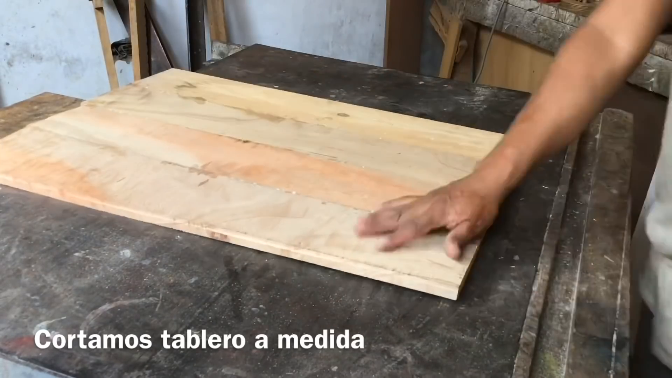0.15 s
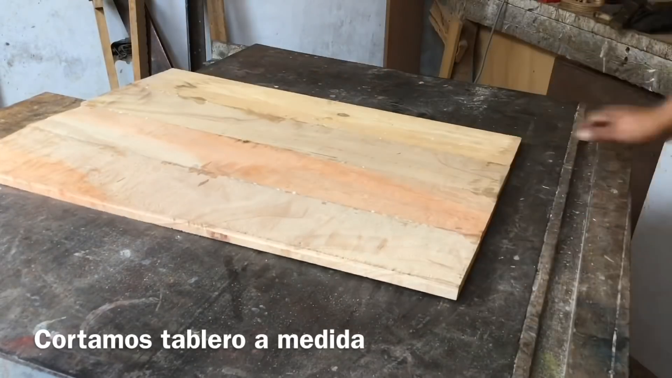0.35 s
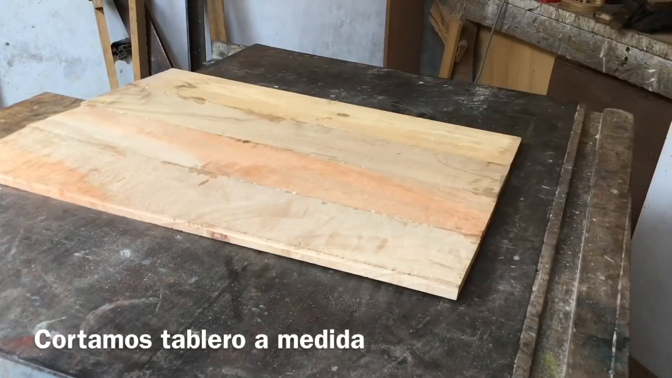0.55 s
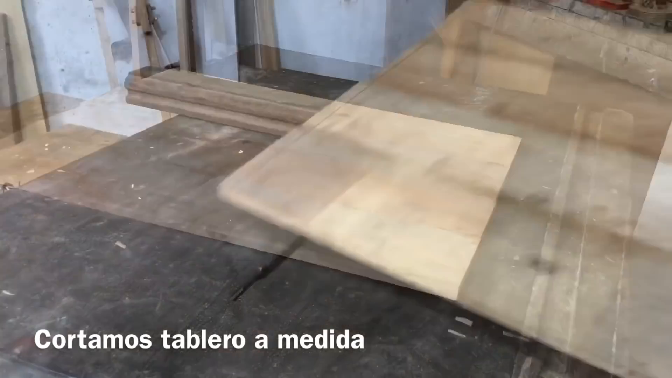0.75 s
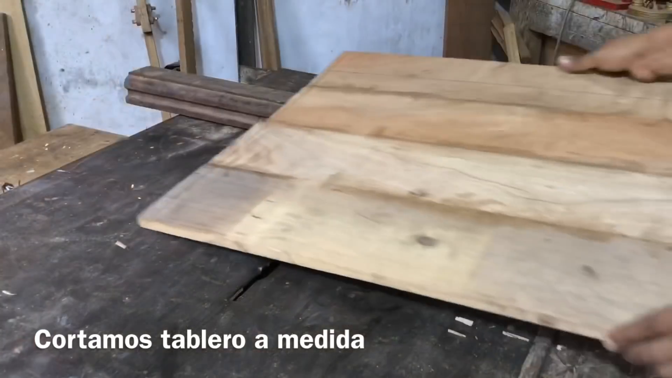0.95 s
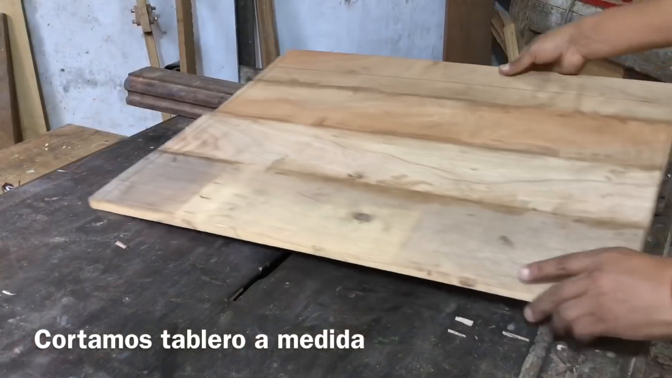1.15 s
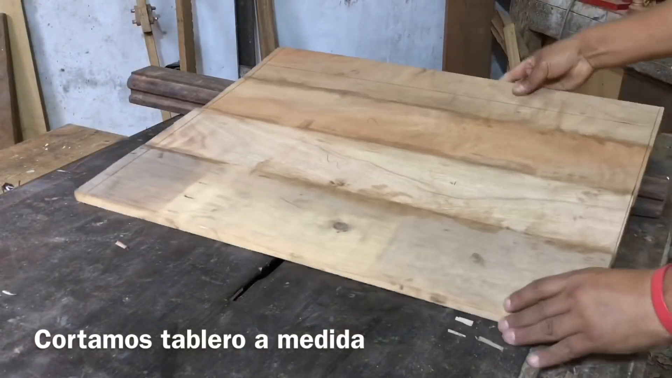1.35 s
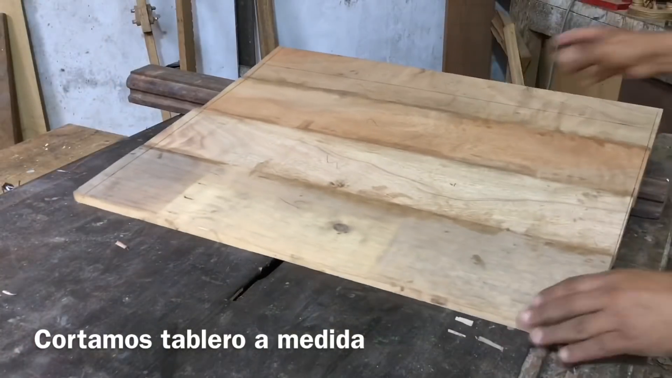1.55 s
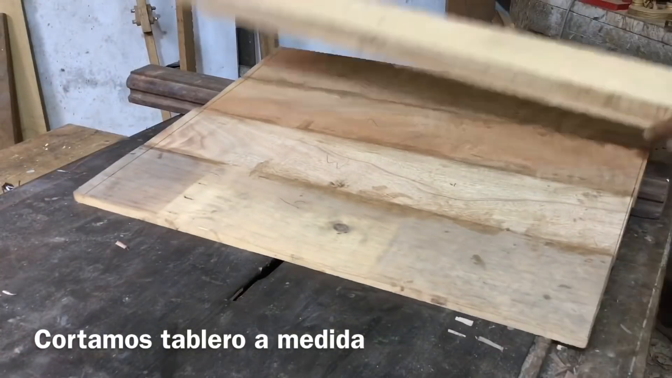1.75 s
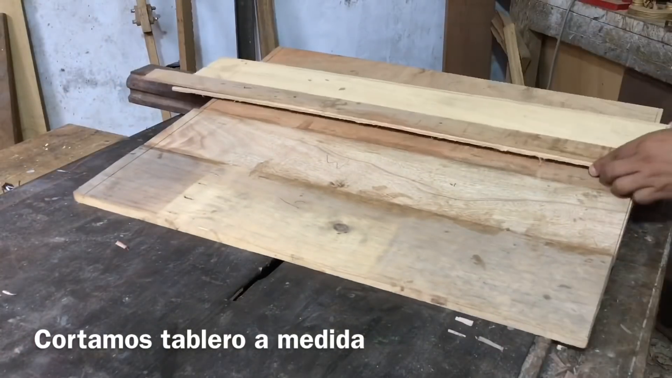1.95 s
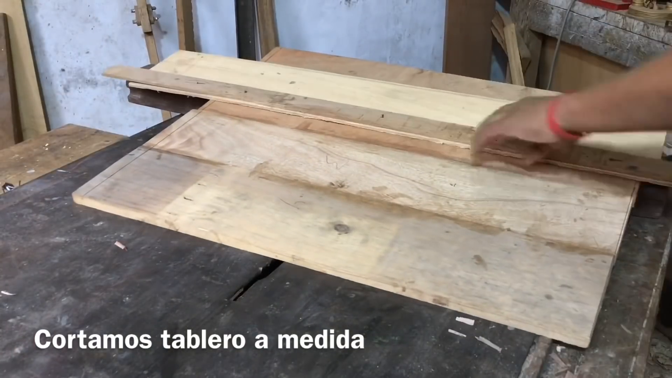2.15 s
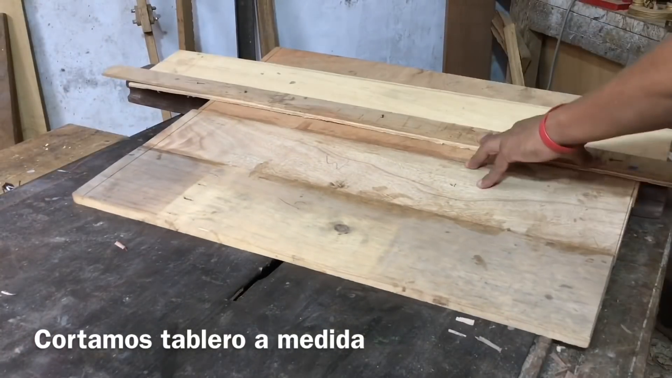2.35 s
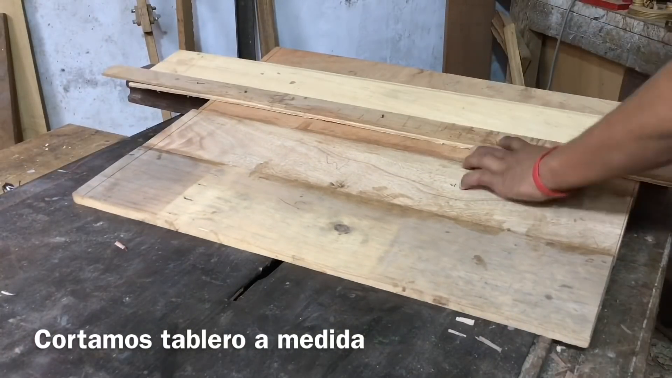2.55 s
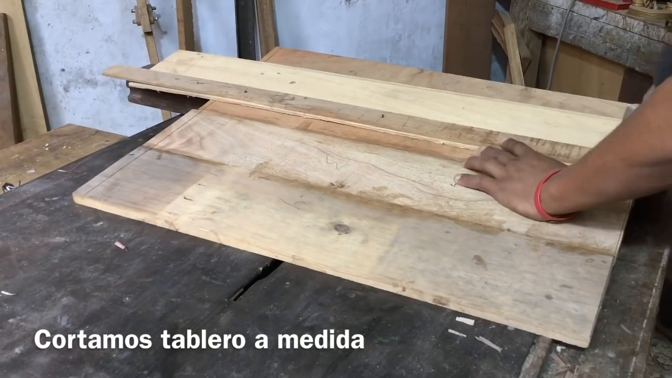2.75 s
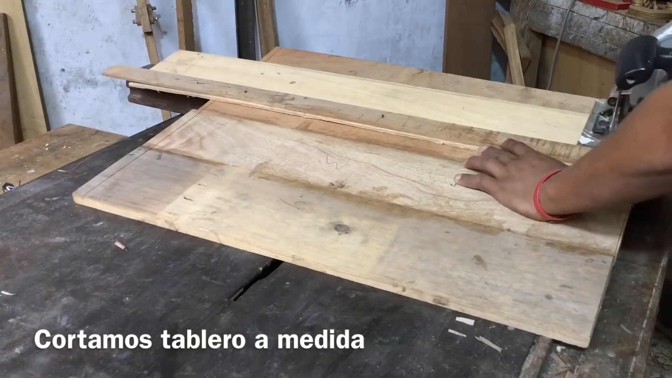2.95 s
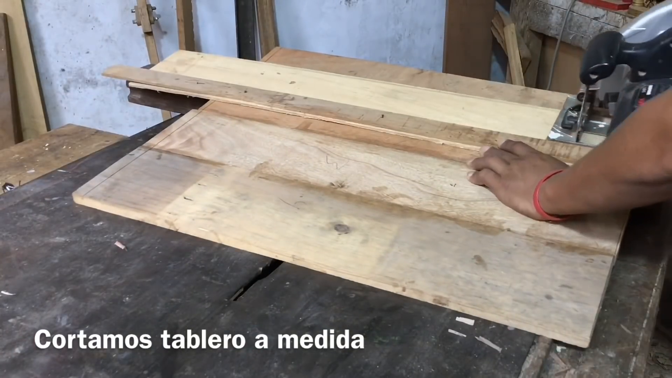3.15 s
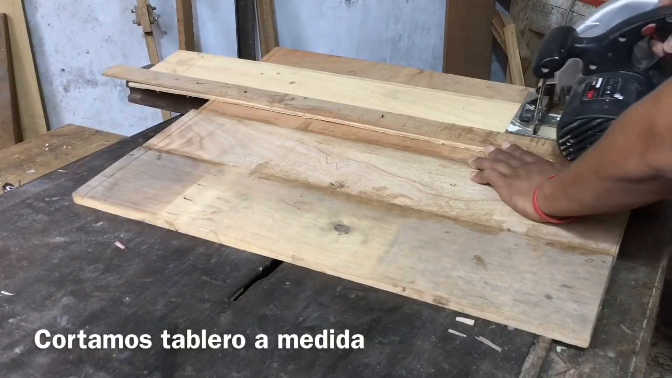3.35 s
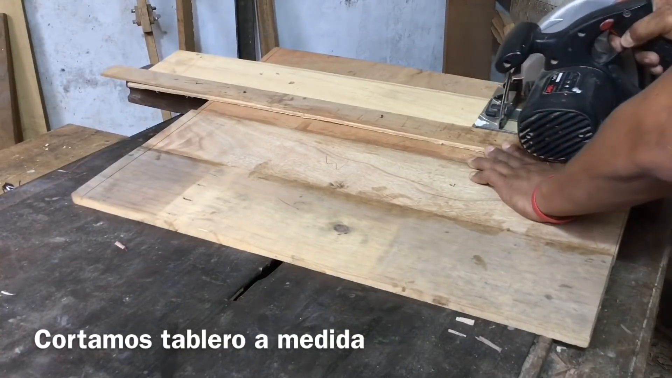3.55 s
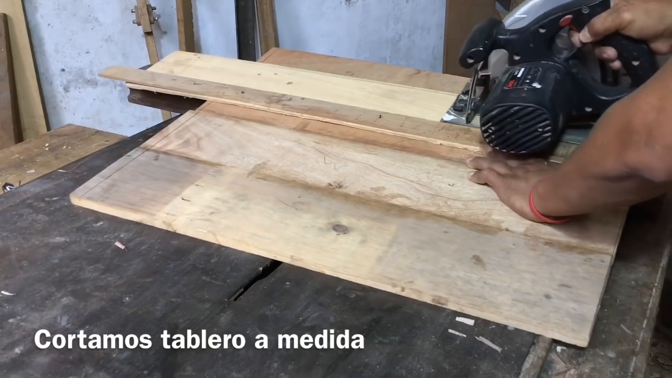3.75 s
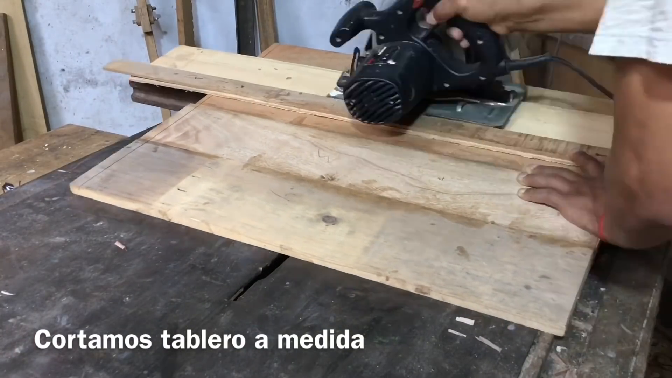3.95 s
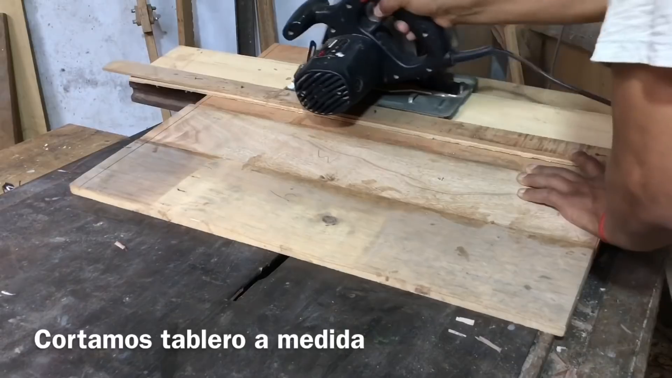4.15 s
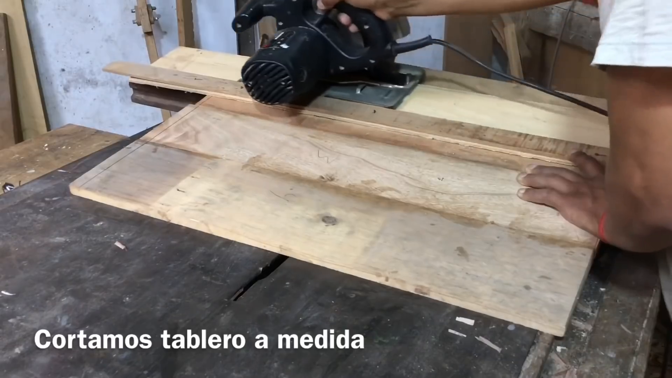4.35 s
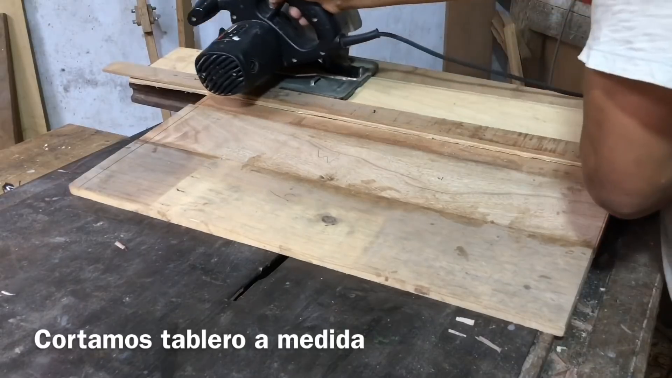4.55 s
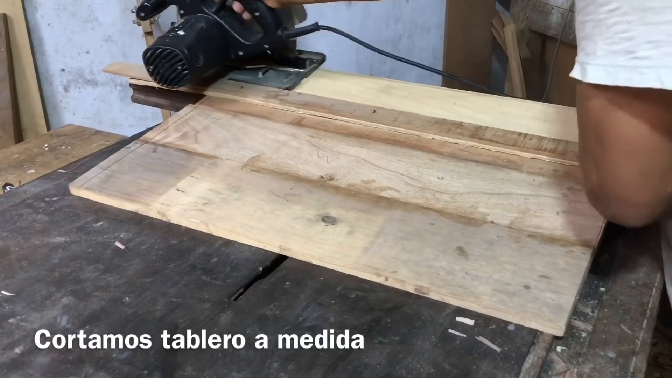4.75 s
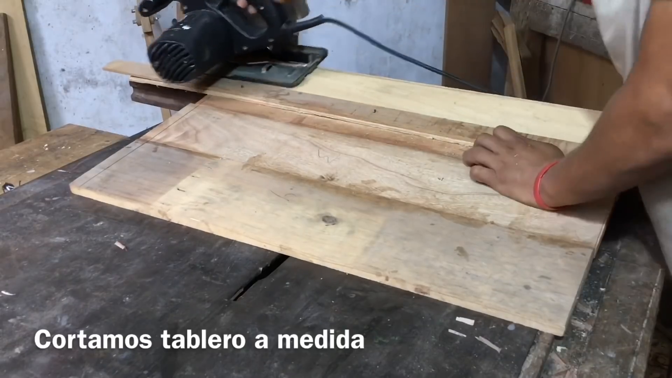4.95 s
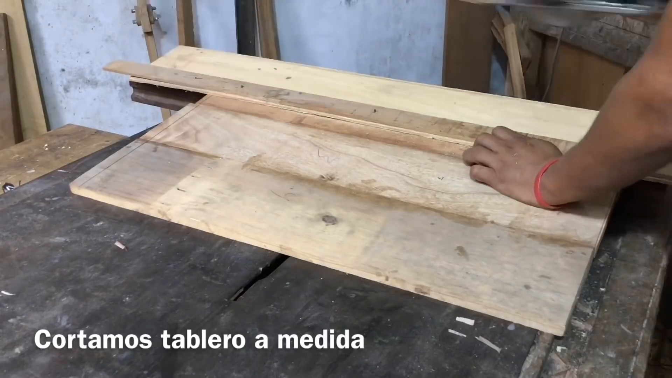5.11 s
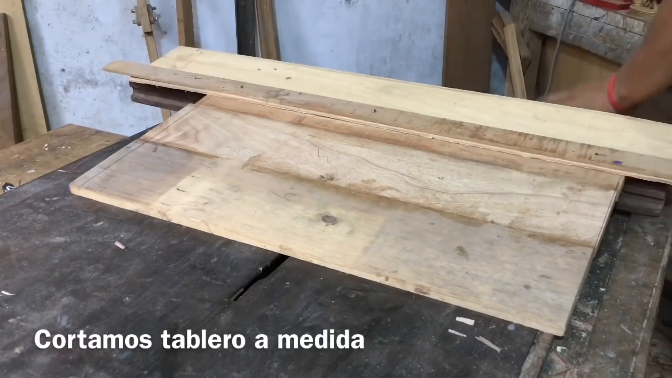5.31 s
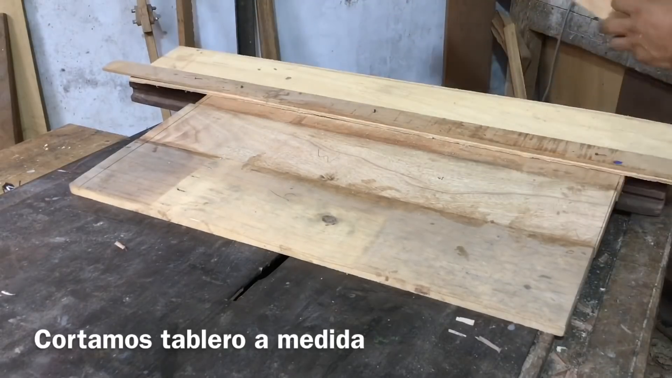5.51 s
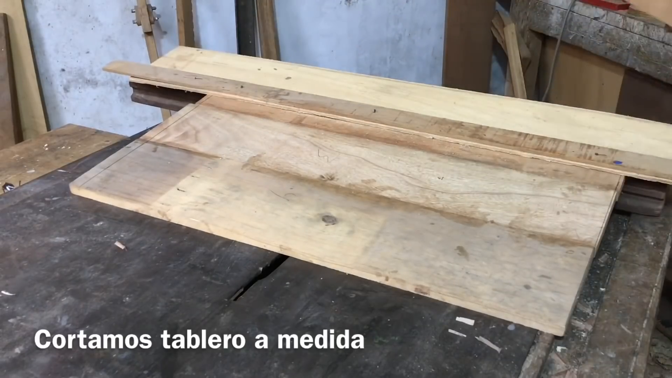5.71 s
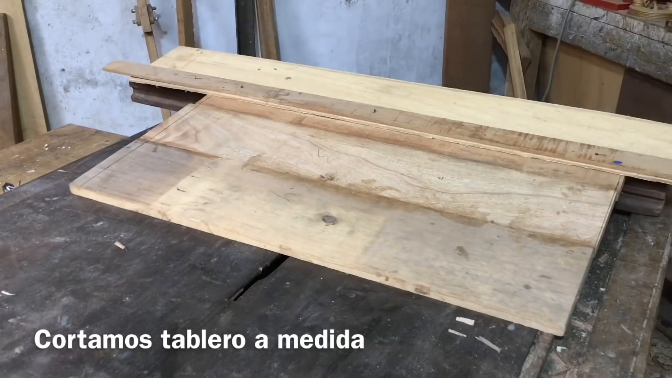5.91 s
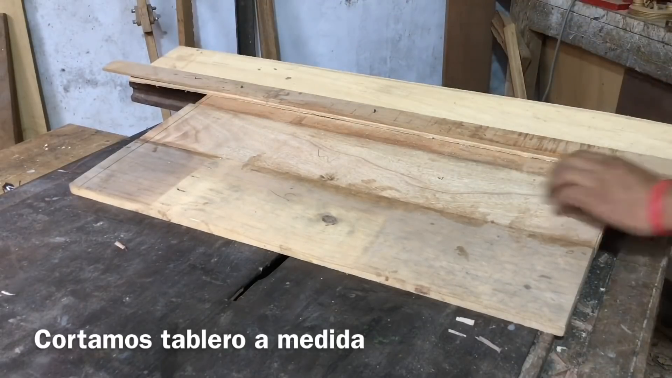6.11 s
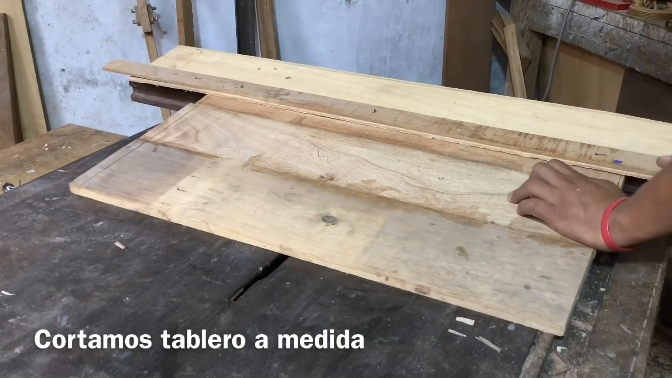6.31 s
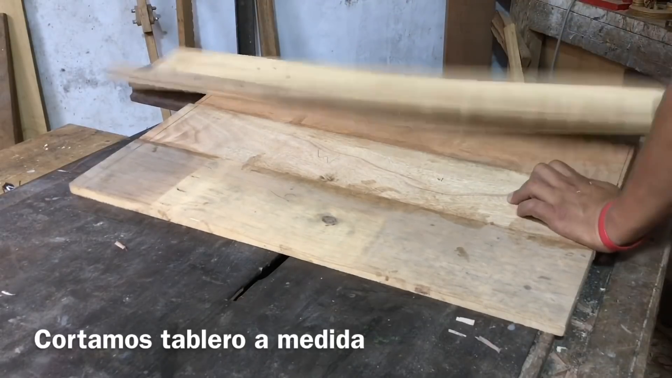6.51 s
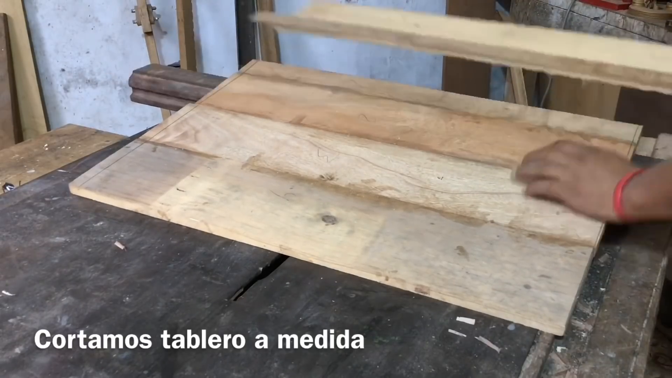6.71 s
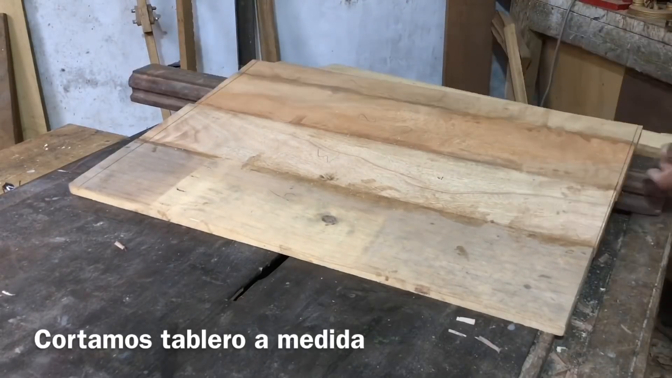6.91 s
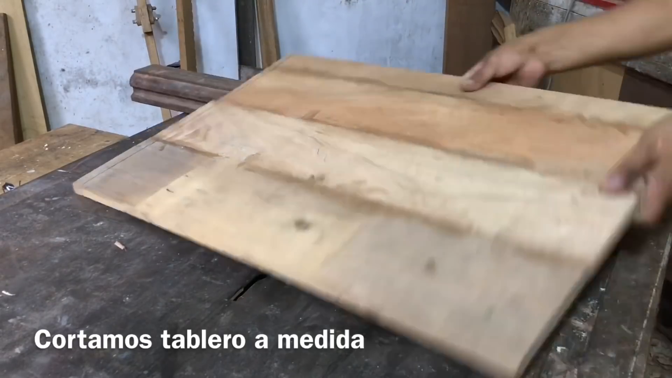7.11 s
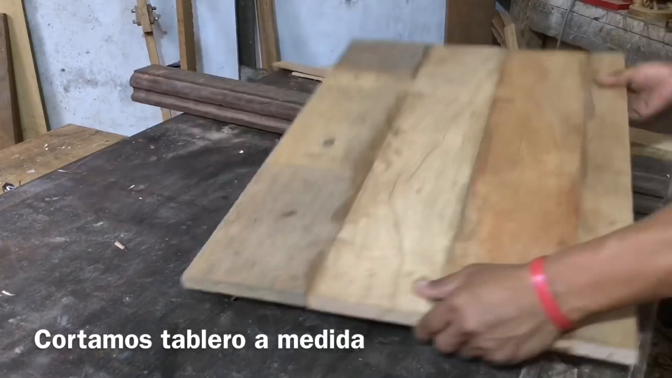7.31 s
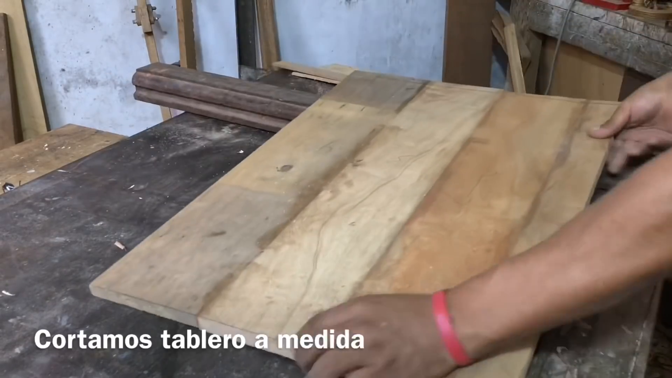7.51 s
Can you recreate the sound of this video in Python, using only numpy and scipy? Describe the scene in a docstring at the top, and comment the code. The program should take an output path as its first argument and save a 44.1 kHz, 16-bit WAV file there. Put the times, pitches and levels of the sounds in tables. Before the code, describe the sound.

A close microphone in a small workshop, both channels identical, with a low murmuring room tone and thin hums. At 0 s a board scrapes and knocks twice, with soft rubbing after; lighter taps come at 0.4 and 0.8 s, a longer slide from about 1 s, and dull knocks around 1.4 s. A faint far bird chirps at 1.6 s. More wood taps at 2 s, and a tiny sharp click at 2.2 s. At 2.43 s a circular saw springs up to a bright whir, bites at 3 s, sags in pitch and screeches, with lumpy low wind rumble until 4.8 s. It frees, switches off at 4.9 s and coasts down in falling, ringing whines until 6.1 s. A hard knock lands at 6.07 s, loud cracks at 6.6, 7.2 and 7.6 s, with scrapes and small clacks between. Six split-second dips to silence occur throughout.

```python
"""Circular saw in a small workshop

A hand-held saw spins up, rips through a wooden panel and coasts down: shaped noise, plus tones on multiples of
the armature speed. Before and after, boards are slid (grainy filtered noise), dropped and knocked (decaying
modes and noise) on the bench; the saw's switch clicks as it starts, and one very short click falls among the
knocks. A far bird chirps over a murmuring room (tone sums, noise). Two equal channels; six brief dips to
silence."""
import sys
import numpy as np
from scipy import signal
from scipy.fft import rfft, irfft, next_fast_len
from scipy.io import wavfile
from scipy.ndimage import uniform_filter1d, map_coordinates

SR = 44100
rng = np.random.default_rng(int(sys.argv[2]) if len(sys.argv) > 2 else 0)


def put_to_file(sound):
    """Save the sound as 16-bit audio at rate SR, in the file named by the first command-line argument."""
    columns = np.atleast_2d(sound).T  # one column per channel
    safe = np.clip(columns, -1, 1)
    whole_steps = np.round(safe * 32767)
    wavfile.write(sys.argv[1], SR, whole_steps.astype(np.int16))


N = 338240
T = np.arange(N) / SR

# Room tone spectrum. Each row: frequency in Hz, density in dB per Hz.
AIR_SPECTRUM = [(82, -56), (140, -42.5), (195, -7), (329, -6.5), (432, -12.5), (556, -3.5), (835, -3),
                (921, -5), (1160, -6), (2040, -15.5), (2380, -13), (4270, -22.5), (14500, -33)]
# Room tone level. Each row: time in seconds, level in dB.
AIR_LEVEL = [(0, -72.5), (.6, -73), (.9, -74.5), (1.6, -70.5), (2.4, -67), (5, -68), (6.2, -61.5),
             (6.8, -65), (7.67, -59.5)]
# Thin hums. Each row: frequency in Hz, width in Hz, level in dB re room tone.
HUMS = [(224, 12, -7), (320, 10, -9), (580, 14, -10), (650, 14, -13), (733, 8, -12), (1160, 20, -16),
        (2390, 20, -18), (2900, 25, -19)]
# A passing thin hum: start in seconds, end in seconds, frequency in Hz, width in Hz, level in dB.
PASSING_HUM = (.08, .68, 730, 14, -73)
# Low drone: start and end in seconds; level in dB at each.
DRONE_S, DRONE_DB = (0.706, 1.395), (-77, -67.5)
# Wall reverberation. Each row: frequency in Hz, t60 in seconds.
WALLS = [(200, 0.43), (2000, 0.2), (12000, 0.045)]

# Wood and hands sliding on the bench. Each row: time of full level in seconds, rise in seconds,
# hold in seconds, hiss in dB (before trim), low scrape in dB, top of the hiss in dB re its rest.
SLIDES = [(0, .01, 0.077, -45, -52.5, 4), (0.161, 0.034, 0.022, -54.5, -80, 15),
          (0.328, 0.17, 0.037, -54, -66.5, 8.5), (.45, .05, 0.43, -80, -82, 2),
          (1.056, 0.12, 0.26, -55.5, -55.5, -15), (1.388, 0.039, 0.16, -59.5, -66, 0),
          (1.97, .015, .015, -70, -82, -2), (2.212, .015, .008, -52, -58.5, -17),
          (2.337, .015, .015, -56, -64, 5), (6.322, .02, .008, -66.5, -62, 2),
          (6.396, .012, 0.024, -74.5, -58, 0), (6.693, 0.034, .008, -63, -55.5, 2),
          (6.849, 0.0055, 0.0067, -47.5, -72, 4), (6.932, 0.021, 0.0069, -40.5, -72, -9),
          (7.05, 0.034, 0.2, -68, -78, 8), (7.113, .02, 0.066, -86, -59.5, -2),
          (7.205, 0.12, 0.017, -63, -52, 8), (7.255, .02, 0.046, -55, -78, 1),
          (7.426, .012, 0.061, -63, -73, 3), (7.524, .025, 0.049, -59, -64, 1)]
# Rubbing spectra, low scrape and dry hiss. Each row: frequency in Hz, density in dB per Hz.
SCRAPE_SPECTRUM, HISS_SPECTRUM = [(88, -46), (150, -25), (203, -13.5), (282, 3), (358, -19.5), (504, -11),
                                  (937, -12.5), (1470, -14.5), (1810, -20), (3500, -22), (4550, -57),
                                  (7700, -120)], [(1470, -54), (2500, 11.5), (2620, 4.5), (3300, -5.5),
                                                  (3580, -3.5), (4840, -0.5), (7300, 0.5), (9570, -8),
                                                  (15000, -2)]
# Resonances of the rubbed boards. Each row: frequency in Hz, width in Hz, level in dB.
WOOD_RINGS = [(580, 100, 4), (840, 69, 2), (1460, 73, 4), (2290, 130, 2)]
STROKE_RISE_DB, HISS_FALL_DB_PER_S, SCRAPE_FALL_DB_PER_S = 36, 460, 240

# Blows, the click of the saw's switch at 2.426 s, and one very short broadband click at 2.1956 s. Each row:
# start in seconds, level in dB, thud, clack and tick in relative dB, t60 of the thud in seconds, own note in
# Hz, note in dB re the level.
KNOCKS = [(.065, -35.5, -5, -1.5, 1, 0.26, 1275, -10), (0.079, -33.5, 6.5, -2.5, -21, 0.17, 580, -5),
          (.439, -56, -14, -26, -29, 0.15, 2120, -8), (.82, -41, -11, -1.5, -12, 0.15, 3200, -1.5),
          (0.873, -66, 9, 5, 13, .2, 977, -8), (1.018, -46, 1, -6.5, -18, .31, 1440, -4),
          (1.374, -29, -4, -14.5, -49, 0.22, 1426, -10), (1.409, -38.5, -12, -20, -36, 0.22, 580, -7),
          (1.439, -35, -9, -18, -23, .24, 1000, -2.5), (1.961, -42, -23, -7.5, -30, .17, 1460, -19),
          (2, -50, -3, -9, -25, .2, 1070, -3), (2.1956, -25.5, 11, 11, 13, 0.011, 3030, -22),
          (2.212, -38.5, -16, -28.5, -33, 0.2, 1820, -14), (2.337, -62.5, 4, 1, 17, 0.16, 980, -8),
          (2.353, -48, 3.5, -9, -21, 0.3, 1200, -11), (2.426, -43.5, -16, 13, 9, 0.36, 4100, 10),
          (6.071, -25, -16, -14, -18, 0.15, 1620, -15), (6.147, -62, -13, -25.5, -29, 0.22, 1150, 9),
          (6.334, -41.5, -3.5, -34, -31, 0.42, 1033, -7), (6.386, -35, -2, -18.5, -41, 0.12, 562, -8),
          (6.454, -58, -15, -3, -1, .1, 1460, -8), (6.51, -51, 1, -26, -47, 0.42, 1335, -1),
          (6.588, -18, -2.5, -5.5, -0.2, 0.25, 3060, -13.5), (6.602, -18.5, -15, -.6, -4, .13, 2790, -7),
          (6.678, -40, -27, -3, -7, 0.12, 982, -5), (6.848, -38, -27, -10, -6, 0.15, 1830, -5),
          (6.894, -61, -4, 0, 10, .2, 1180, -8), (6.929, -41, -25, -8, 8, .26, 1510, -17),
          (7.224, -15, -33, -6, -5.5, 0.16, 1610, -7), (7.319, -59.5, -17, 2, 9, 0.4, 1010, 0),
          (7.421, -31.5, -10.5, -10, -19, 0.21, 2895, -4.5), (7.517, -44, -3, -9, -5, 0.21, 1640, -8),
          (7.55, -49.5, 11, -16, -12, .15, 580, 6), (7.623, -19.5, -9.5, -5.5, -11, 0.14, 1186, -13),
          (7.642, -26, -2, -7.5, -13, 0.23, 1347, -9)]
# Board modes. Each row: nominal frequency in Hz, relative level in dB, longest t60 in seconds.
BOARD_MODES = [(570, -22, 0.6), (924, 0.5, 0.24), (1028, -5, 0.53), (1620, -23, 0.058), (2270, -16, 0.26),
               (2700, -22.5, 0.06), (2920, -10, 0.15), (3100, -18, 0.1), (4096, 9, 0.036), (4920, 5, 0.18),
               (5200, -30, 0.088), (6120, 2.5, 0.21), (7050, -3, 0.045), (7332, -52, 0.19),
               (8473, -29, 0.044), (8400, -40, 0.057)]
# Clatter spectrum. Each row: frequency in Hz, density in dB per Hz.
CLATTER_SPECTRUM = [(71, -54), (120, -49), (535, -2.5), (712, -6.5), (1240, -5), (1490, 0), (2150, -6.5),
                    (2870, -2), (3520, -10.5), (4780, -8.5), (5300, -12.5), (6110, -8.5), (16000, -19.5)]
ATTACK_S = 0.00084  # time constant for a clack of 0 dB

# Far bird. Each row: start in seconds, length in seconds, first pitch in Hz, level in dB,
# multiple of the pitch about which the tones are weighted.
CHIRPS = [(1.617, .04, 1830, -68, 9.3), (1.665, 0.036, 1780, -81, 6), (1.681, 0.096, 2020, -65.5, 2)]

# Saw noise. Each row: time in seconds, body level in dB, screech level in dB.
SAW_LEVELS = [(2.43, -35, -37), (2.56, -32.5, -31.5), (2.93, -31.5, -30), (3.08, -29.5, -27.5),
              (3.43, -29, -27), (3.6, -25.5, -24.5), (3.87, -27.5, -26), (3.93, -25.5, -26.5),
              (4.02, -29, -23.5), (4.06, -26, -31.5), (4.32, -25.5, -29), (4.44, -29.5, -29.5),
              (4.5, -27.5, -25.5), (4.71, -27, -29), (4.75, -24.5, -28.5), (4.8, -29, -33.5),
              (4.99, -30.5, -36), (5.22, -37.5, -36), (5.93, -45, -50.5), (6.1, -60.5, -68)]
# Saw spectra: free, cutting, coasting, rumble, low end. Each row: frequency in Hz, density in dB per Hz.
FREE_SPECTRUM, CUT_SPECTRUM, COAST_SPECTRUM = [(710, -57.5), (1200, -16.5), (1730, -13.5), (1950, -5.5),
                                               (2110, -8.5), (2430, -5.5), (2790, 1.5), (3360, -9),
                                               (3950, -5), (5410, -11), (5900, -5.5), (6370, -6),
                                               (9210, -10), (14200, 1.5), (16000, 7.5)], [(710, -29.5), (1200, -29), (1950, -11),
                                                             (2980, -1.5), (3550, -12), (4800, -4.5),
                                                             (5970, -2.5), (6440, -7.5), (7170, -2),
                                                             (9110, -11.5), (10100, -7), (12100, -8),
                                                             (13200, 5), (14000, 7), (16000, -1.5)], [(710, -49), (1200, -1),
                                                                          (1910, -24.5), (2180, -4),
                                                                          (2530, -17), (2830, -26),
                                                                          (3360, -13), (3830, 1.5),
                                                                          (4450, -11), (5130, -0.5),
                                                                          (5410, -6.5), (7820, -4),
                                                                          (10900, -11), (13900, -3),
                                                                          (16000, -6)]
RUMBLE_SPECTRUM, WHIRR_SPECTRUM = [(59, -50.5), (100, -25), (151, -19), (225, -2.5), (314, 0), (635, 0),
                                   (697, -2), (921, -2), (1720, -10), (2400, -14), (3120, -44),
                                   (5280, -120)], [(88, -75.5), (150, -37), (373, -24), (420, -19.5),
                                                   (634, -5), (738, -8.5), (1720, 3.5), (2000, -5.5),
                                                   (2600, -31), (4400, -120)]
# Blade and guard ringing. Each row: frequency in Hz, width in Hz, level in dB before a common lift.
BLADE_RINGS = [(2880, 46, -2), (3900, 130, 1), (4700, 39, -7), (5000, 64, 3), (7850, 71, -7),
               (12600, 42, -23), (13800, 44, 2), (14000, 91, -1.5)]
# Whines while coasting. Each row: multiple of the armature speed, level in dB re body.
GEAR_ORDERS = [(18, -23), (24, -22), (30, -22), (36, -18), (40, -18), (48, -21), (54, -17), (72, -16),
               (90, -20), (108, -18)]
# Flares where a whine crosses a blade or guard ring. Each row: frequency in Hz, width in Hz, gain in dB.
FLARES = [(3900, 200, 8), (5100, 200, 8), (7400, 400, 5), (13950, 450, 13)]
# Multiples of the armature speed with the loudest lines.
STRONG_ORDERS = [15, 16, 18, 19, 20, 23, 24, 34, 36, 43, 44, 48]
# Low orders. Each row: multiple, level running free in dB, level in the deep cut in dB.
LOW_ORDERS = [(1, -63, -61), (2, -73, -61.5), (3, -62, -69), (5, -44, -54.5)]
# Brief swells of low orders. Each row: centre in seconds, half width in seconds, multiple, level in dB.
SWELLS = [(3.04, .08, 2, -51), (3.42, .07, 5, -41), (4.35, .1, 1, -50), (4.58, .17, 5, -45),
          (4.91, .05, 1, -48.5), (5.0, .06, 3, -53), (5.15, .08, 5, -48), (5.35, .13, 5, -61)]
# Buzz of the windings. Each row: frequency in Hz, relative level in dB.
MAINS_BUZZ = [(240, -15.5), (480, 1.5), (960, -6)]
# Drag of the cut. Each row: time in seconds, armature speed lost in turns per second.
DRAG = [(2.95, 0), (3.03, 9), (3.18, 38), (3.35, 69), (3.44, 76.5), (3.512, 88), (3.64, 99.5), (3.7, 99.5),
        (3.8, 107), (3.94, 107), (4.03, 99), (4.035, 112), (4.11, 97), (4.17, 100), (4.3, 101),
        (4.37, 105.5), (4.42, 102.5), (4.445, 102.5), (4.45, 72), (4.53, 80.5), (4.62, 81), (4.72, 89.5),
        (4.76, 86), (4.82, 40), (4.9, 28)]
# Air and chips blown past the microphone. Each row: time in seconds, level in dB.
BLAST = [(3.0, -63), (3.05, -50.5), (3.11, -37.5), (3.17, -49), (3.23, -48), (3.27, -39.5), (3.31, -45),
         (3.36, -45), (3.43, -48), (3.51, -29), (3.56, -34.5), (3.59, -25), (3.86, -26), (3.89, -29),
         (3.92, -24), (3.96, -28), (4.08, -28), (4.11, -35), (4.14, -26), (4.18, -33.5), (4.21, -29),
         (4.32, -27.5), (4.36, -35), (4.45, -32), (4.48, -30), (4.57, -26), (4.71, -30.5), (4.755, -26.5),
         (4.8, -49), (4.84, -86.5)]

ON_S, OFF_S, GONE_S = 2.427, 4.93, 6.13
FREE_HZ, SPIN_GAP_HZ, SPIN_S = 408, 118, .155  # free speed, shortfall at the start, its time constant
COAST_HZ, FRICTION_HZ_PER_S = 305, 275
FAN_HZ, FAN_S = 78, .13  # part of the speed that the fan brakes fast
TOUCH_S, LEAVE_S, BITE_S = 2.96, 4.83, 0.065  # teeth in the wood from, to; ramp
IDLE_SHARE, FULL_SHARE = 0.28, 0.85  # cutting colour out of and in the wood
SHALLOW_HZ, DEEP_HZ = 17, 80  # drag where the cut starts to deepen, and is deep
LINES_DB, LINES_DEEP_DB = -23, -3  # lines re noise
WHIRR_DB, WHIRR_DB_PER_OCTAVE = -18.5, 4.5  # re body; per doubling of speed
SUB_DB, SUB_DB_PER_BLAST_DB = -61.5, 2.41
MAINS_DB, INRUSH_DB, INRUSH_S, STRAIN_DB = -66, 17, .11, 6  # buzz; more at the start and under load

# Brief dips to silence. Each row: time in seconds, fade out in seconds, fade in in seconds.
DIPS = [(1.396, 0.014, 0.016), (1.748, 0.0097, 0.013), (2.1975, 0.008, 0.011), (4.0324, 0.013, .014),
        (4.448, 0.014, 0.013), (6.1325, 0.035, 0.015)]
TOP_HZ = 15900


def amp(db):
    """Amplitude of a level in dB."""
    return 10 ** (np.asarray(db) / 20)


def unit(x):
    """x at rms 1."""
    return x / np.sqrt(np.mean(x ** 2) + 1e-20)


def along(points, hz):
    """(Hz, value) points interpolated on a log axis."""
    f, v = np.transpose(points)
    return np.interp(np.log(hz + 1), np.log(f + 1), v)


def curves(rows):
    """One value per sample for each column after the time."""
    s, *cols = np.transpose(rows)
    return [np.interp(T, s, c) for c in cols]


def ramp(start_s, end_s, edge_s):
    """1 between two times, with straight edges inside them."""
    return np.clip(np.minimum(T - start_s, end_s - T) / edge_s, 0, 1)


def noise():
    """White noise."""
    return rng.standard_normal(N)


def wobble(rate_hz):
    """A smooth random curve, rate_hz knots a second."""
    return map_coordinates(rng.standard_normal(int(N * rate_hz / SR) + 4), [T * rate_hz])


def filtered(x, response):
    """x times a response of frequency."""
    m = next_fast_len(N + 8192)
    return irfft(rfft(x, m) * response(np.fft.rfftfreq(m, 1 / SR)), m)[..., :N]


def band(x, spectrum, lo_hz, hi_hz, peaks=(), peak_db=0):
    """x shaped by a spectrum between two soft edges, with resonances on top, at rms 1."""
    def response(hz):
        rings = 1 + sum(amp(peak_db + db) / np.hypot(1, 2 * (hz - c) / w) for c, w, db in peaks)
        edges = np.sqrt((1 + (lo_hz / (hz + 1)) ** 16) * (1 + (hz / hi_hz) ** 16))
        return amp(along(spectrum, hz)) * rings / edges
    return unit(filtered(x, response))


def patchy(x, depth_db, bins, frames):
    """Random patches of gain over time and frequency, at rms 1."""
    z = signal.stft(x, nperseg=512)[2]
    field = uniform_filter1d(rng.standard_normal(z.shape), size=bins, axis=0)
    field = uniform_filter1d(field, size=frames, axis=1)
    return unit(signal.istft(z * amp(depth_db * unit(field)), nperseg=512)[1][:N])


def room(x, wet_db):
    """Direct sound plus the walls' answer; each frequency dies at its own speed."""
    hz, t, z = signal.stft(rng.standard_normal(SR // 3), SR, nperseg=256)
    decay = amp(-60 * t / along(WALLS, hz)[:, None])
    tail = signal.istft(z * decay, SR, nperseg=256)[1]
    delayed = np.pad(x, (130, 0))
    wet = signal.fftconvolve(delayed, tail / np.linalg.norm(tail))[:N]
    return (x + amp(wet_db) * wet) / np.sqrt(1 + amp(2 * wet_db))


def narrow_hum(hz, width_hz):
    """Noise through one narrow resonance, at rms 1."""
    return unit(filtered(noise(), lambda f: 1 / (1 + (2 * (f - hz) / width_hz) ** 2)))


def room_tone():
    """Steady murmur of shaped noise with thin wavering hums, and a low drone for a moment."""
    air = band(room(noise(), wet_db=1.5), AIR_SPECTRUM, 160, 16760)
    for hz, width_hz, db in HUMS:
        air += amp(db + 0.81 * wobble(2.3)) * narrow_hum(hz, width_hz)
    air_db, = curves(AIR_LEVEL)
    drone = band(noise(), [(60, -33), (85, 5), (170, 1.0)], 100, 170)
    drone *= amp(np.interp(T, DRONE_S, DRONE_DB)) * ramp(*DRONE_S, 0.016)
    start_s, end_s, hz, width_hz, db = PASSING_HUM
    passing = amp(db) * ramp(start_s, end_s, .05) * narrow_hum(hz, width_hz)
    return amp(air_db) * air + drone + passing


def slides():
    """Rubbing: grainy noise in the wood's low resonances and a dry hiss."""
    grit = amp(1.4 * wobble(70))
    scrape = band(room(patchy(noise(), 0.47, 3, 12), wet_db=11.0), SCRAPE_SPECTRUM, 154, 3500, WOOD_RINGS)
    hiss = band(room(patchy(noise(), 2.5, 8, 4), wet_db=-5.5), HISS_SPECTRUM, 2800, 15000)
    top = filtered(hiss, lambda hz: 1 / (1 + (10500 / (hz + 1)) ** 8))
    out = np.zeros(N)
    for full_s, rise_s, hold_s, hiss_db, scrape_db, top_db in SLIDES:
        grow_db = -STROKE_RISE_DB * np.maximum(full_s - T, 0) / max(rise_s, .002)
        after_s = np.maximum(T - full_s - hold_s, 0)
        low = amp(scrape_db - SCRAPE_FALL_DB_PER_S * after_s) * scrape
        high = amp(hiss_db - 7.5 - HISS_FALL_DB_PER_S * after_s) * (hiss + (amp(top_db) - 1) * top)
        out += grit * amp(grow_db) * (low + high)
    return out


def board_ring(t, t60_s, clack_db):
    """Decaying board modes, detuned and reweighted at random on each call."""
    ring = 0
    for hz, db, longest_s in BOARD_MODES:
        mode_db = db + clack_db * (hz > 3300) + rng.normal(0, 3)
        decay_db = -60 * t / min(0.44 * t60_s, longest_s)
        ring += amp(mode_db + decay_db) * np.sin(2 * np.pi * hz * rng.normal(1, 0.0396) * t)
    return ring


def knocks():
    """Blows crack, ring the board's modes and clatter, treble dying first; one row is a bare short click."""
    edges_hz = [150, 600, 3500, 9000, 17000]
    clatter = [band(room(noise(), wet_db=6.5), CLATTER_SPECTRUM, lo, hi)
               for lo, hi in zip(edges_hz, edges_hz[1:])]
    out, t = np.zeros(N + SR), np.arange(SR // 2) / SR
    crack = 0.97 * amp(-60 * t / 0.0087)
    for s, db, thud_db, clack_db, tick_db, t60_s, note_hz, note_db in KNOCKS:
        i = round(s * SR)
        # a dull sound starts slowly
        attack = 1 - np.exp(-t / max(ATTACK_S * amp(-.45 * clack_db), 1e-4))
        note = amp(note_db - 60 * t / (0.44 * t60_s)) * np.sin(2 * np.pi * note_hz * t)
        sound = (amp(-16.5) * board_ring(t, t60_s, clack_db) + note) * attack
        bands_db, t60_shares = (thud_db, 0, clack_db, tick_db), (1.0, 0.97, 0.68, 0.4)
        for x, band_db, share in zip(clatter, bands_db, t60_shares):
            envelope = attack * amp(-60 * t / (t60_s * share))
            if share < 1:  # no crack in the thud
                envelope = envelope + crack
            sound += amp(band_db - 12.0) * envelope * np.resize(x[i:], len(t))
        out[i:i + len(t)] += amp(db) * sound
    return signal.sosfilt(signal.butter(4, 150, 'high', fs=SR, output='sos'), out[:N])


def bird():
    """Short falling chirps, husky by phase jitter, with the even multiples strongest."""
    out = np.zeros(N)
    for s, length_s, hz, db, loudest in CHIRPS:
        u = np.clip((T - s) / length_s, 0, 1)
        phase = 2 * np.pi * np.cumsum(hz * (1 - 0.097 * u)) / SR + .5 * wobble(320)
        tones = sum(amp(-3.5 * abs(k - loudest) - 9 * (k % 2)) * np.sin(k * phase) for k in range(1, 7))
        out += amp(db) * np.sin(np.pi * u ** 0.39) ** 2 * tones
    return out


def armature():
    """Speed (turns per s) and depth of cut (0-1): spin-up less drag, then coasting."""
    drag_hz, = curves(DRAG)
    since_s = np.abs(T - OFF_S)
    driven_hz = FREE_HZ - SPIN_GAP_HZ * np.exp(-np.abs(T - ON_S) / SPIN_S) - drag_hz
    coasting_hz = COAST_HZ - FRICTION_HZ_PER_S * since_s + FAN_HZ * np.exp(-since_s / FAN_S)
    speed_hz = np.where(T < OFF_S, driven_hz, np.maximum(coasting_hz, 1))
    return speed_hz, np.clip((drag_hz - SHALLOW_HZ) / (DEEP_HZ - SHALLOW_HZ), 0, 1)


def saw_drive(turn, deep):
    """Brush and tooth noise swelling once a turn, with armature lines that sharpen under load."""
    lines_db = LINES_DB + (LINES_DEEP_DB - LINES_DB) * deep
    lines = sum(amp(5 * (k in STRONG_ORDERS)) * np.sin(k * turn + rng.uniform(0, 2 * np.pi))
                for k in range(12, 54))
    lines = patchy(lines, 5, 3, 16)
    beat = 1 + 0.093 * np.cos(turn)
    drive = room(beat * patchy(noise(), 2.2, 5, 9), wet_db=-7.0) + amp(lines_db) * lines
    return drive / np.sqrt(1 + amp(2 * lines_db))


def body_and_screech(drive, load):
    """The drive in two bands, moving between free, cutting and coasting spectra."""
    coast = np.clip((T - 5.05) / 0.78, 0, 1)
    out = 0
    for level_db, (lo, hi) in zip(curves(SAW_LEVELS), ((1500, 11000), (11000, 17000))):
        free, cut = band(drive, FREE_SPECTRUM, lo, hi), band(drive, CUT_SPECTRUM, lo, hi)
        ringing = band(patchy(drive, 3.4, 3, 10), COAST_SPECTRUM, lo, hi, BLADE_RINGS, peak_db=7.0)
        idle = (1 - coast) * free + coast * ringing
        out = out + amp(level_db) * ((1 - load) * idle + load * cut)
    return out


def blast(load):
    """Lumpy low rumble, like air blown across the microphone, over a wider-swinging sub-bass."""
    blast_db, = curves(BLAST)
    lumps = unit(amp(load * (2.65 * wobble(150) + 1.3 * wobble(35))) * noise())
    rumble = amp(blast_db) * band(lumps, RUMBLE_SPECTRUM, 100, 2300)
    smooth_db = uniform_filter1d(blast_db, size=SR // 10)
    sub_db = SUB_DB + SUB_DB_PER_BLAST_DB * (smooth_db - blast_db.max() + 4.5)
    sub = band(noise(), [(25, 5.0), (50, 6.0), (130, -1.5)], 18, 130)
    return rumble + amp(sub_db + 3.5 * wobble(15)) * sub


def low_orders(turn, deep):
    """Wavering tones on low multiples of the armature speed, with brief swells."""
    steady = ramp(ON_S, OFF_S + 0.079, 0.33)
    tones = 0
    for k, free_db, deep_db in LOW_ORDERS:
        swell = sum(amp(db) * np.exp(-((T - s) / width_s) ** 2)
                    for s, width_s, order, db in SWELLS if round(order) == round(k))
        level = np.maximum(steady * amp(free_db + (deep_db - free_db) * deep), swell)
        tones += level * amp(1.5 * wobble(30)) * np.sin(round(k) * turn + .4 * wobble(60))
    return tones


def windings(bite):
    """Mains buzz, stronger at the inrush and under load."""
    inrush_db = INRUSH_DB * np.exp(-np.abs(T - ON_S) / INRUSH_S)
    fall_db = 400 * np.maximum(T - LEAVE_S, 0)
    buzz_db = MAINS_DB + inrush_db + STRAIN_DB * bite - fall_db
    return sum(amp(buzz_db + db + 1.8 * wobble(20)) * np.sin(2 * np.pi * hz * T) for hz, db in MAINS_BUZZ)


def gear_whines(turn, speed_hz, body_db):
    """High orders while coasting, flaring as each crosses a ring of blade or guard."""
    step = np.gradient(turn)  # radians per sample
    whines = 0
    for k, db in GEAR_ORDERS:
        flare_db = sum(gain_db * np.exp(-((k * speed_hz - hz) / width_hz) ** 2)
                       for hz, width_hz, gain_db in FLARES)
        level = amp(body_db + db + 4 * wobble(18) + flare_db)
        audible = abs(k * step - 1.25) < .95  # about 2.1 to 15.4 kHz
        whines += level * np.sin(k * turn + .9 * wobble(250)) * audible
    return (T > 5) * whines


def saw():
    """All saw sounds, driven by one armature speed and depth of cut."""
    speed_hz, deep = armature()
    turn = 2 * np.pi * np.cumsum(speed_hz) / SR
    body_db = curves(SAW_LEVELS)[0]
    bite = ramp(TOUCH_S, LEAVE_S, BITE_S)
    load = np.clip(IDLE_SHARE + (FULL_SHARE - IDLE_SHARE) * bite, 0, 1)
    drive = saw_drive(turn, deep)
    whirr_db = body_db + WHIRR_DB + WHIRR_DB_PER_OCTAVE * np.log2(speed_hz / FREE_HZ)
    whirr = amp(whirr_db) * band(drive, WHIRR_SPECTRUM, 170, 1390)
    noises = body_and_screech(drive, load) + blast(load) + whirr
    tones = room(low_orders(turn, deep) + windings(bite), -13)
    whines = room(gear_whines(turn, speed_hz, body_db), -9)
    return (noises + np.sqrt(2) * (tones + whines)) * ramp(ON_S, GONE_S, .002)


def scene():
    """All sources, the same in both channels."""
    mono = room_tone() + slides() + knocks() + bird() + saw()
    return np.array([mono, mono])


def record(dry):
    """Brief dips to silence, rounded peaks, then the band limit."""
    gain = np.ones(N)
    for s, out_s, in_s in DIPS:
        gain *= np.clip(np.maximum((s - T) / out_s, (T - s) / in_s), 0, 1)
    loud = gain * dry
    rounded = loud / (1 + np.abs(loud / .36) ** 4) ** (1 / 4)
    return filtered(rounded, lambda hz: np.sin(np.pi / 2 * np.clip((TOP_HZ - hz) / 300 + .5, 0, 1)) ** 2)


dry = scene()
out = record(dry)
put_to_file(out)
```